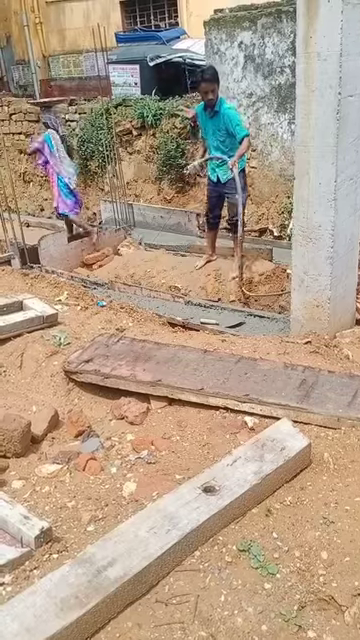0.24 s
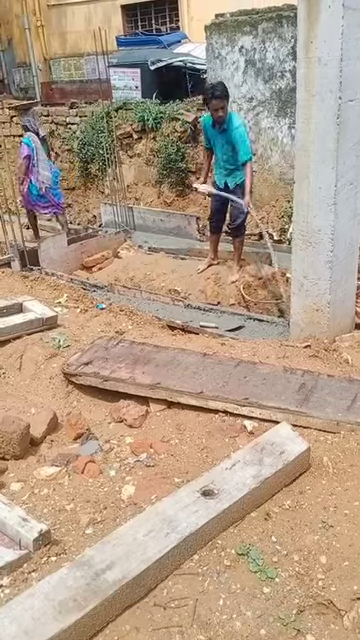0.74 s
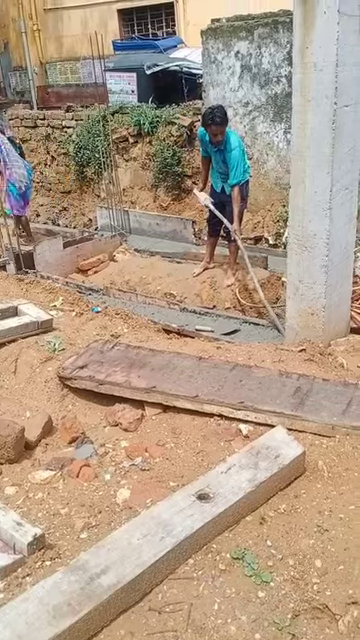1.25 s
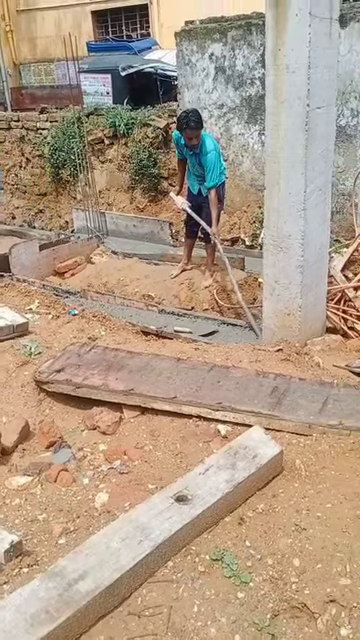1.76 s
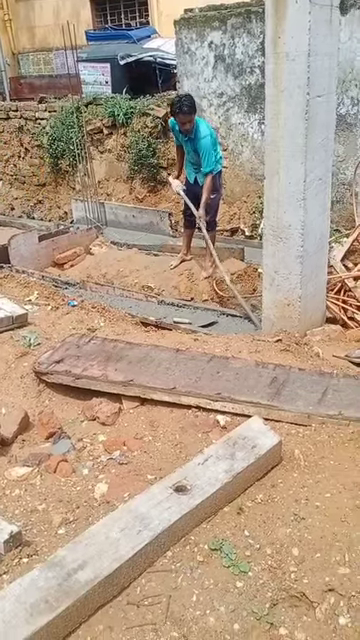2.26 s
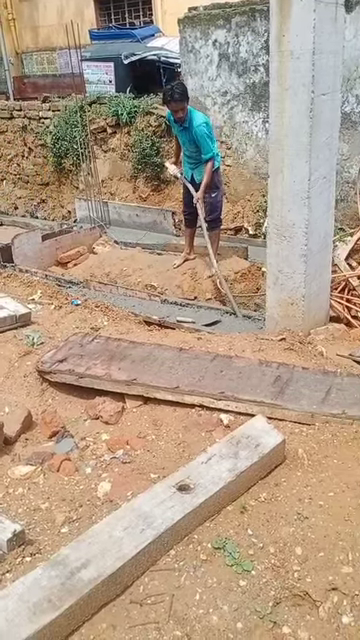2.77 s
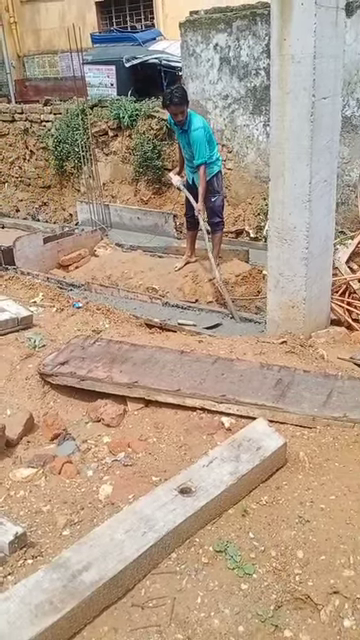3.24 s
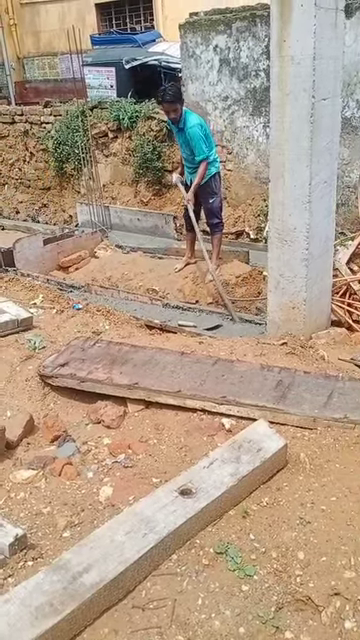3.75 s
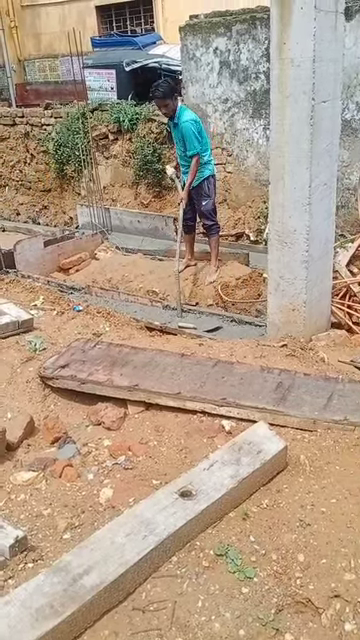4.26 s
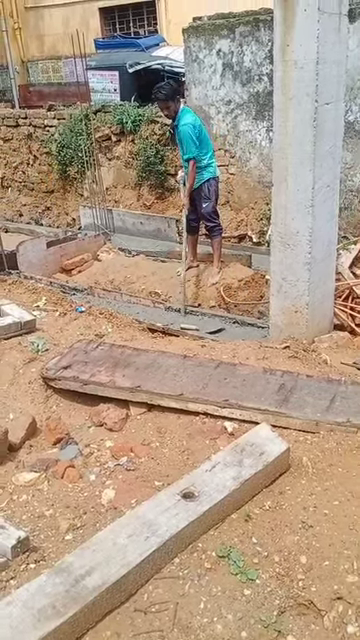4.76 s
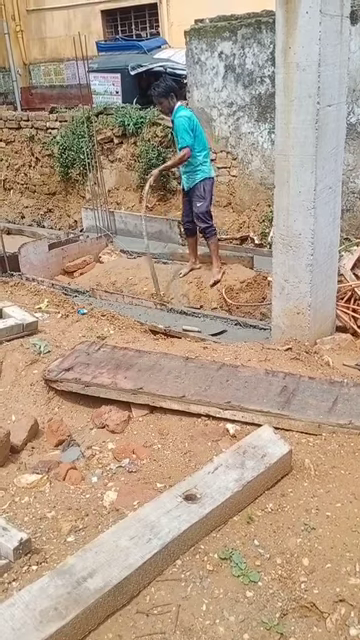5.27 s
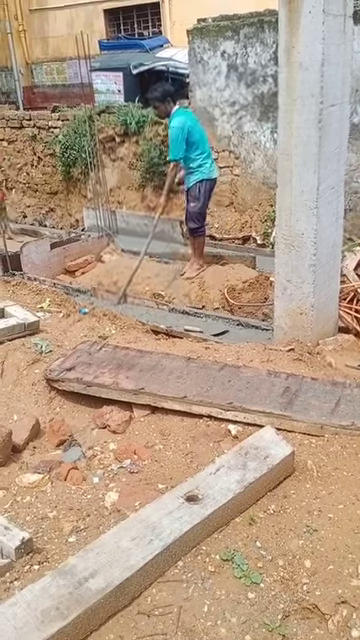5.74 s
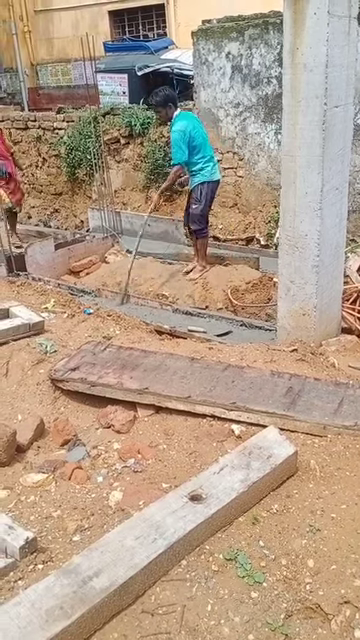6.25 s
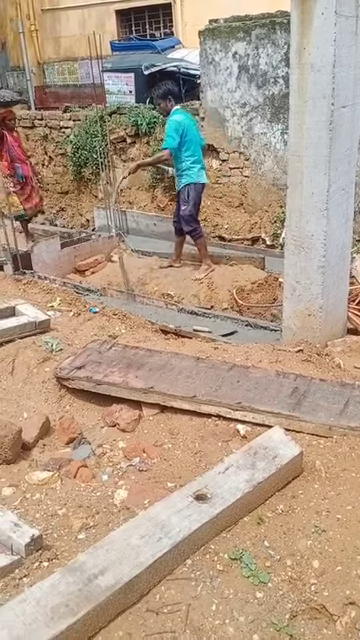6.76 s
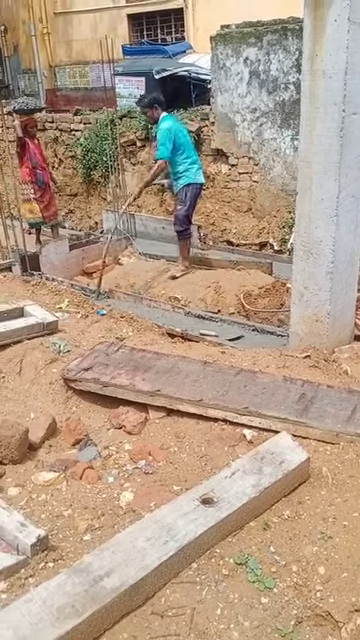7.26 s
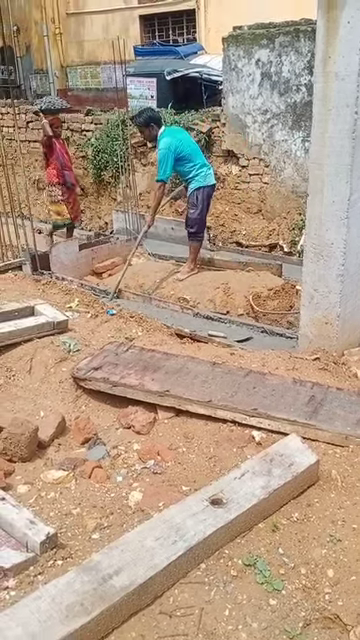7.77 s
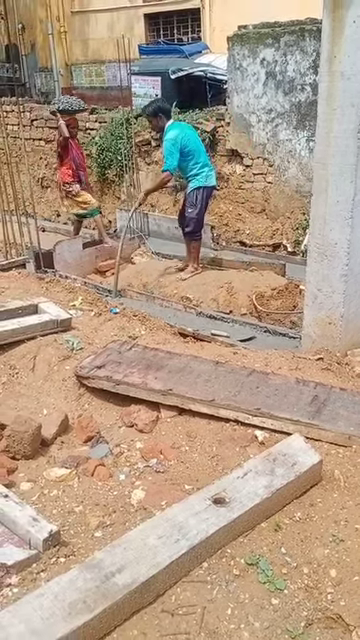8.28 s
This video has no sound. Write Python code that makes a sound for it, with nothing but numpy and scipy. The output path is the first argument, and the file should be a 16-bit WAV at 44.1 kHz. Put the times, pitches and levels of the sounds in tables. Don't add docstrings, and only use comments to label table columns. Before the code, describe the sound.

After a tiny silence, a concrete needle vibrator is already running a few metres from a phone microphone outdoors. A dense, bright metallic rattle fills the whole stretch, with a low hum beneath and a clear steel ring at the start and near 0.8 s. From about 1.1 to 2.5 s concrete grips the needle: the hum drops, stutters and booms, and the rattle throbs fast. It recovers, then sags again around 2.9-3.9 s, with casing ring around 3.5 s, and 4.3-5.2 s. Wet sloshing is loosest near 5 s, with faint gulps; a distant engine drones weakly around 2-3 and 4-5.3 s. A short hold at 5.9-6.5 s booms strongly. From 6.6 to 7.5 s it runs freer, higher and evener, with thin whines and a sharper rattle. A last deep boom swells around 7.6-8.4 s, and the buzzing continues to the end at 8.5 s.

```python
import sys
import numpy as np
from scipy import signal
from scipy.fft import rfft, irfft, next_fast_len
from scipy.io import wavfile

SR = 44100
rng = np.random.default_rng(int(sys.argv[2]) if len(sys.argv) > 2 else 0)


def volts_from_db(level):
    exponent = np.asarray(level, float) / 20
    return 10 ** exponent


def unload_audio(sound):
    columns = np.transpose(np.atleast_2d(sound))
    steps = np.round(np.clip(columns, -1, 1) * 32767)
    wavfile.write(sys.argv[1], SR, steps.astype(np.int16))


N = 375423

# (t/s, looseness/0-1)
LOOSE = [
    (.09, .1),
    (.9, .35),
    (1.8, 0.3),
    (2.2, 0.74),
    (3.4, 0.48),
    (4.3, 0.8),
    (5.2, 0.84),
    (6.2, 0.73),
    (6.9, .5),
    (8.5, 0.12),
]


def span(start, end):
    on = slice(max(int(start * SR), 0), min(int(end * SR), N))
    return on, np.arange(on.start, on.stop) / SR


def swell(start, end, edge):
    out = np.zeros(N)
    on, t = span(start, end)
    out[on] = np.clip(np.minimum(t - start, end - t) / edge, 0, 1)
    return out


def spells(rows, edge):
    return sum(volts_from_db(level_db) * swell(start, end, edge) for start, end, level_db in rows)


def bump(s, half):
    out = np.zeros(N)
    on, t = span(s - half, s + half)
    out[on] = np.cos(np.pi / 2 * (t - s) / half) ** 2
    return out


def in_time(rows):
    s, *columns = np.transpose(rows)
    return [np.interp(np.arange(N) / SR, s, column) for column in columns]


def rms_one(x):
    return x / np.sqrt(np.mean(x ** 2) + 1e-20)


def drift(rate):
    r = np.exp(-80 * np.pi * rate / SR)
    noise = rng.standard_normal(N // 40 + 2002)
    slow = signal.lfilter([1], [1, -2 * r, r * r], noise)[2000:]
    return np.interp(np.arange(N) / 40, np.arange(len(slow)), rms_one(slow))


def resonance(x, hz, width):
    r = np.exp(-np.pi * width / SR)
    a = [1, -2 * r * np.cos(2 * np.pi * hz / SR), r * r]
    once = signal.lfilter([1, 0, -1], a, x)
    return rms_one(signal.lfilter([1], a, once))


def coloured_bands(x, colour, count):
    size = next_fast_len(N)
    points = np.array(colour)
    log_points = np.log(points[:, 0])
    log_hz = np.log(np.arange(1, size // 2 + 2) * SR / size)
    shaped = rfft(x, size) * volts_from_db(np.interp(log_hz, log_points, points[:, 1], left=-90, right=-90))
    shaped = shaped / np.std(irfft(shaped, size))
    centres = np.linspace(log_points[0], log_points[-1], count)
    for k, centre in enumerate(centres):
        share = np.interp(log_hz, centres, np.arange(count) == k)
        yield np.exp(centre), irfft(shaped * share, size)[:N]


def whirl_speed():
    # (t/s, speed/turns per s)
    loads = [(0, 272), (.934, 243), (1.382, 220.5), (2.279, 259), (2.938, 225), (3.728, 263), (4.43, 228),
             (5.049, 266.7), (5.738, 217.4), (6.445, 269), (7.443, 217.5)]
    speed_up_s, slow_down_s = .154, .118
    t = np.arange(N) / SR
    speed = before = 257
    for s, goal in loads:
        u = np.maximum(t - s, 0) / (speed_up_s if goal > before else slow_down_s)
        speed = speed + (goal - before) * (1 - (1 + u) * np.exp(-u))
        before = goal
    return speed


def grip():
    # (start/s, end/s)
    grips = [
        (1.12, 2.52),
        (2.94, 3.9),
        (4.3, 5.25),
        (5.86, 6.54),
        (7.5, 8.45),
    ]
    return np.clip(sum(swell(start, end, 0.054) for start, end in grips), 0, 1)


def wall_swing():
    # (t/s, peak level/dB, half length/s)
    booms = [(1.34, -28, 0.055), (1.45, -31.5, 0.087), (1.563, -28, 0.061), (1.65, -34, 0.072),
             (1.803, -29, .15), (1.935, -28.5, .1), (2.086, -24.5, .1), (2.31, -33, 0.069),
             (2.44, -41, 0.062), (3.058, -25.5, 0.11), (3.234, -34, 0.14), (3.48, -30, 0.19),
             (3.682, -29.5, 0.23), (4.374, -35, 0.097), (4.63, -25.5, 0.36), (4.8, -28, 0.053),
             (4.96, -23.5, 0.18), (5.19, -40, .07), (5.846, -37, 0.063), (6.03, -30, 0.037),
             (6.15, -21.5, 0.11), (6.25, -28, .06), (6.38, -18, 0.13), (6.501, -23, 0.057),
             (7.598, -25, 0.13), (7.803, -18.5, 0.21), (8.053, -22.5, 0.32), (8.462, -48, .12)]
    # (t/s, half length/s, depth/0-1)
    slips = [(1.13, 0.093, 0.84), (1.369, 0.017, 0.7), (1.49, 0.011, 0.8), (1.584, .015, 0.8),
             (1.62, 0.013, .6), (1.68, 0.013, .4), (1.978, 0.023, 1), (2, 0.017, 0.85), (2.161, .015, .6),
             (2.188, 0.013, 0.6), (2.36, 0.023, 0.4), (4.73, 0.047, 0.3), (4.849, .03, .55),
             (5.114, 0.039, 0.8), (5.966, .05, 0.3), (6.45, .025, 0.7), (6.565, 0.029, 0.2),
             (6.703, 0.4, 0.46), (8.31, 0.084, 0.7)]
    t, held = np.arange(N) / SR, grip()
    free_db, gripped_db = -32.5 + 0.67 * t, -36.5
    out = (1 - held) * volts_from_db(free_db) + held * volts_from_db(gripped_db)
    out += sum(volts_from_db(peak_db) * bump(s, half) for s, peak_db, half in booms)
    for s, half, depth in slips:
        out *= 1 - np.clip(depth, 0, 1) * bump(s, half)
    chatter_db = 0.82 * held * drift(31)
    return out * volts_from_db(chatter_db)


def hum(turns):
    # (start/s, end/s, level/dB)
    pressed = [(.88, 1.19, -46), (1.21, 1.5, -42.5), (1.5, 1.76, -44.5), (1.76, 1.91, -38),
               (1.91, 2.1, -44), (2.09, 2.2, -33), (2.25, 2.37, -33), (2.36, 2.49, -43),
               (2.58, 2.98, -46.5), (2.97, 3.14, -33), (3.1, 3.42, -39.5), (3.36, 3.76, -30),
               (3.72, 3.93, -41), (4.27, 4.64, -43.5), (4.62, 4.88, -33), (4.93, 5.23, -32),
               (5.79, 6.13, -37), (6.12, 6.55, -36.5), (7.48, 7.78, -43), (7.86, 8.33, -46.5),
               (8.05, 8.3, -39.5), (8.33, 8.6, -43)]
    once = np.sin(2 * np.pi * turns + .05 * drift(25))
    twice = np.sin(2 * 2 * np.pi * turns + 0.52 * drift(19))
    out = wall_swing() * (1 + .08 * drift(25)) * once
    out += spells(pressed, 0.056) * (1 + 0.24 * drift(31)) * twice
    return np.sqrt(2) * out


def bearing_whines(turns):
    # (start/s, end/s, multiple of the whirl, level/dB)
    whines = [(.1, .45, 5.26, -42), (.5, 1.08, 6, -39), (.15, .7, 7.3, -44), (.15, .45, 10, -38),
              (1.05, 1.34, 8, -36), (1.2, 1.72, 8, -34), (1.4, 1.9, 4, -50), (2.98, 3.5, 8, -36),
              (3.2, 3.7, 3, -53), (4.1, 4.6, 4, -49), (4.7, 5.1, 7.7, -38), (5.3, 5.8, 6, -42),
              (5.5, 5.8, 10, -35), (5.8, 6.45, 7.8, -40), (6.3, 7.5, 6, -42), (6.75, 7.55, 5.26, -39),
              (6.8, 7.3, 6.55, -45), (6.8, 7.4, 8, -39), (7.1, 7.6, 7.3, -43), (6.6, 7.6, 10, -40),
              (6.9, 7.5, 12, -38), (7.65, 8.5, 8.15, -41), (4.15, 4.65, 12, -35), (5.5, 5.85, 12, -36),
              (6.5, 6.9, 12.6, -39), (5.1, 5.8, 7.9, -40)]
    out = np.zeros(N)
    slip, flutter = .12 * drift(25), volts_from_db(2.0 * drift(12))
    for start, end, multiple, level_db in whines:
        on = span(start, end)[0]
        whine = np.sin(multiple * (2 * np.pi * turns[on] + slip[on]))
        out[on] += volts_from_db(level_db + 1.5) * (swell(start, end, .08) * flutter)[on] * whine
    return np.sqrt(2) * out


def contacts(turns, load):
    throb_free, throb_loaded = .04, .28
    throb = throb_free + (throb_loaded - throb_free) * load
    shaft = 2 * np.pi * .257 * turns + .4 * drift(2)
    rise_and_fall = np.sin(shaft) + 0.6 * np.sin(2 * shaft) + 0.18 * np.sin(3 * shaft)
    bunching = np.clip(throb, 0, .8) * rise_and_fall
    bunching += 0.13 * np.cos(2 * np.pi * turns + .5 * drift(28))
    knocks = (rng.random(N) < 120 / SR) * rng.exponential(0.053, N)
    knocks = signal.lfilter([1], [1, -np.exp(-1 / (0.00043 * SR))], knocks)
    uneven = volts_from_db(1.0 * drift(20.3) + 1.0 * drift(570))
    return rng.standard_normal(N) * np.exp(bunching) * (1 + knocks) * uneven


def shifting_modes(x, width_hz, depth_db):
    size = next_fast_len(N)
    spectrum, hz = rfft(x, size), np.arange(size // 2 + 1) * SR / size
    weights = np.exp(2 * np.array([drift(0.72) for k in range(10)]))
    knots, out = np.arange(0, SR / 2, width_hz), np.zeros(N)
    depth_db = depth_db * np.interp(hz, [2000, 6000], [1, .6])
    for share in weights / weights.sum(axis=0):
        heights = np.interp(hz, knots, rng.standard_normal(len(knots)))
        out += share * irfft(spectrum * volts_from_db(depth_db * heights), size)[:N]
    return out * np.std(x) / np.std(out)


def rattle(hits):
    # (t/s, level/dB, sharpness/dB)
    rattle_path = [(.09, -17.5, 0), (.29, -18, 0), (.89, -19.5, 2.5), (1.49, -18.5, 0.5), (2.09, -22, 4.5),
                   (2.49, -20.5, 4.5), (2.89, -19, 4.5), (3.49, -20, 2.5), (4.09, -20, 3),
                   (4.69, -17.5, -3), (5.29, -20.5, 7), (5.89, -19.5, 4), (6.09, -21.5, 10),
                   (6.6, -21, 6.5), (7.05, -20.5, 10), (7.49, -20.5, 8), (7.89, -24.5, 13.5),
                   (8.51, -21, 10)]
    # (f/Hz, level per Hz/dB)
    rattle_colour = [(380, -77), (650, -22), (871, -11.5), (1040, -16.5), (1370, -8.5), (2390, -8),
                     (2590, -4.5), (3810, -3), (4970, -6.5), (5680, -2.5), (6320, -2), (7710, -23),
                     (9160, -35), (14800, -22), (15600, -27)]
    level_db, sharp_db = in_time(rattle_path)
    dull_db = 5.5 * in_time(LOOSE)[0]
    dull_db, sharp_db = dull_db - np.mean(dull_db), sharp_db - np.mean(sharp_db)
    out = np.zeros(N)
    for hz, band in coloured_bands(hits, rattle_colour, count=16):
        dull = np.interp(hz, [1500, 2600], [1, 0])
        sharp = np.interp(hz, [4500, 5600, 7060, 8500], [0.12, 0.51, 0.9, 0.27])
        wander_db = np.interp(hz, [600, 1400], [3.5, .55]) * drift(5.0)
        out += band * volts_from_db(dull * dull_db + sharp * sharp_db + wander_db)
    return shifting_modes(out, width_hz=30, depth_db=4.2) * volts_from_db(level_db + 0.5)


def casing_ring(hits):
    # (f/Hz, width/Hz)
    casing = [(3217, 30), (3890, 46), (7328, 24)]
    casing_rest = [-40, -40, -57]
    # (start/s, end/s, level/dB)
    ringing = [
        [(.7, .92, -21.5), (.88, 1.1, -27), (1.2, 2.45, -34), (3.46, 3.6, -28), (7.02, 7.36, -37),
         (8.17, 8.42, -41)],
        [(0, .27, -21.5), (.3, .65, -33), (2.54, 2.66, -38), (3.24, 3.5, -25), (3.46, 4.16, -21.5),
         (3.75, 4.12, -42), (5.95, 6.1, -36)],
        [(.54, .95, -51), (2.35, 3.3, -53), (3.2, 4.4, -51), (4.4, 5.1, -56), (5.1, 5.75, -48),
         (6.85, 7.2, -44)],
    ]
    # (f/Hz, width/Hz, level against it/dB)
    followers = [(7326, 30, 1), (8240, 44, -8), (10170, 100, -16)]
    out = np.zeros(N)
    strengths = [volts_from_db(rest_db) + spells(rows, 0.051) for rest_db, rows in zip(casing_rest, ringing)]
    for (hz, width), strength in zip(casing, strengths):
        out += strength * volts_from_db(-2.0 + 1.3 * drift(24)) * resonance(hits, hz, width)
    for hz, width, under_db in followers:
        out += strengths[-1] * volts_from_db(under_db) * resonance(hits, hz, width)
    return out


def hose_ring(hits):
    # (start/s, end/s, f/Hz, level/dB)
    hose = [(0, 0.616, 4270, -28), (0, 0.755, 3570, -27.5), (.8, 1.413, 3600, -27.5),
            (1.287, 1.9, 3630, -24), (1.794, 2.35, 3635, -24.5), (2.0, 2.563, 3430, -26),
            (2.6, 3.595, 2977, -31), (3.1, 3.847, 3640, -26.5), (4.2, 4.749, 3000, -36),
            (4.704, 5.205, 2880, -35), (5.5, 6.145, 2080, -31.5), (5.451, 5.85, 2570, -30),
            (5.551, 5.947, 4260, -34), (5.846, 6.2, 3770, -28), (6.15, 6.5, 3480, -31),
            (7.05, 7.502, 4345, -32), (7.55, 8.1, 3617, -25.5), (8.0, 8.6, 3550, -30.5)]
    out = np.zeros(N)
    for start, end, hz, hose_db in hose:
        on = span(start, end)[0]
        out[on] += volts_from_db(hose_db) * swell(start, end, 0.12)[on] * resonance(hits[on], hz, width=310)
    return out


def slosh():
    # (f/Hz, level per Hz/dB)
    slosh_colour = [(20, -24), (45, -22), (80, -12), (150, -2.5), (250, 5.5), (310, -7), (390, -12.5),
                    (480, -9), (620, -16), (750, -46)]
    stiff_db, loose_db, rumble_grip_db = -59.5, -41, 3
    splutter_free_db, splutter_grip_db, settling_db_per_s = -62, -47.5, 1.5
    held, out = grip(), np.zeros(N)
    rumble_db = stiff_db + (loose_db - stiff_db) * in_time(LOOSE)[0] + rumble_grip_db * held
    gripped_db = splutter_grip_db - settling_db_per_s * np.arange(N) / SR
    splutter_db = splutter_free_db + (gripped_db - splutter_free_db) * held
    for hz, band in coloured_bands(rng.standard_normal(N), slosh_colour, count=14):
        if hz < 290:
            level_db, lumps_db = rumble_db + 1.5, 3.0
        else:
            level_db, lumps_db = splutter_db + 8, 6.5
        out += band * volts_from_db(level_db + lumps_db * drift(7))
    return out


def gulps():
    # (t/s, half length/s, f/Hz, level/dB)
    pockets = [(.11, .04, 430, -46), (.28, 0.11, 410, -47), (.66, .04, 520, -48), (3.08, 0.074, 110, -45.5),
               (5.2, .06, 90, -47), (5.74, 0.13, 65, -46.5), (5.7, 0.17, 180, -45), (7.4, 0.075, 70, -55),
               (7.75, 0.25, 115, -53), (8.297, .12, 298, -51), (1.354, .15, 737, -40)]
    noise = rng.standard_normal(N)
    return sum(volts_from_db(level_db) * bump(s, half) * resonance(noise, hz, 40) for s, half, hz, level_db in pockets)


def drone():
    # (start/s, end/s, start f/Hz, end f/Hz, level/dB)
    notes_heard = [
        (2.0, 2.51, 84, 97, -48),
        (2.45, 3.0, 97, 96.2, -50),
        (4.08, 4.601, 163, 167.7, -43.5),
        (4.66, 5.106, 172, 183.8, -50),
        (5.154, 5.32, 163, 162.3, -37),
    ]
    out, t = np.zeros(N), np.arange(N) / SR
    for start, end, start_hz, end_hz, level_db in notes_heard:
        cycles = np.cumsum(np.interp(t, [start, end], [start_hz, end_hz])) / SR
        note = np.sin(2 * np.pi * cycles + 0.46 * drift(14))
        out += swell(start, end, 0.075) * volts_from_db(level_db + 2.5 + 2.7 * drift(9.2)) * note
    return out


def scene():
    speed = whirl_speed()
    turns = np.cumsum(speed) / SR
    free_speed, loaded_speed = 262, 220
    load = np.clip((free_speed - speed) / (free_speed - loaded_speed), 0, 1)
    hits = contacts(turns, load)
    casing_hits = hits * rng.choice([-1, 1], N)
    needle = hum(turns) + bearing_whines(turns)
    needle += rattle(hits) + casing_ring(casing_hits) + hose_ring(casing_hits)
    return (needle + slosh() + gulps() + drone())[None]


def notch(x, hz, width, depth):
    b, a = signal.iirpeak(hz, hz / width, fs=SR)
    return x - depth * signal.lfilter(b, a, x)


def low_pass(x):
    return signal.sosfilt(signal.butter(12, 15980, fs=SR, output="sos"), x)


def record(dry):
    start_s, fade_s = 0.083, 0.012
    fade = np.clip((np.arange(N) / SR - start_s) / fade_s, 0, 1) ** 2
    dry = notch(dry, hz=11400, width=490, depth=0.47)
    rounded = .85 * np.tanh(dry * fade / .85)
    top_cut = signal.ellip(14, .3, 60, 15470, fs=SR, output="sos")
    return low_pass(signal.sosfilt(top_cut, rounded))


dry = scene()
out = record(dry)
unload_audio(out)
```